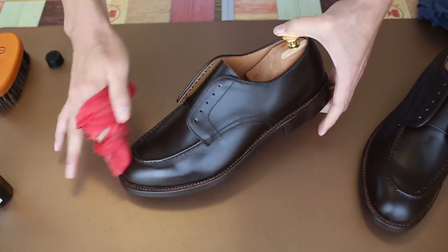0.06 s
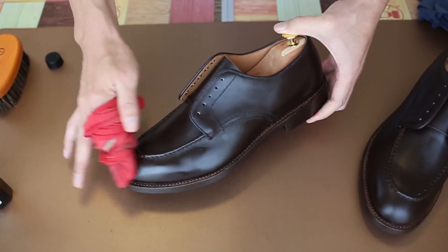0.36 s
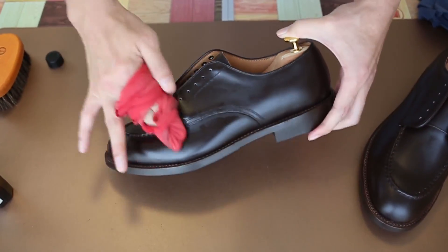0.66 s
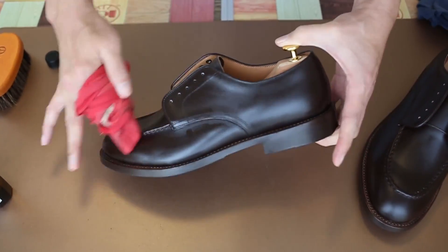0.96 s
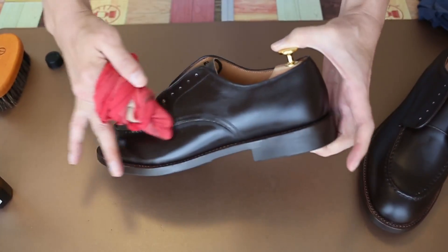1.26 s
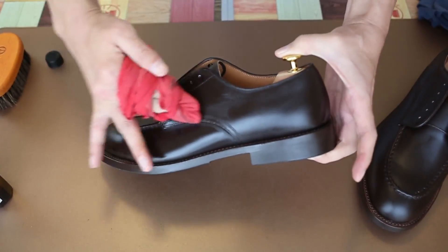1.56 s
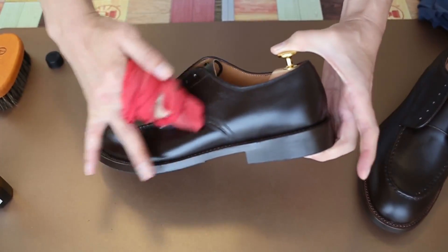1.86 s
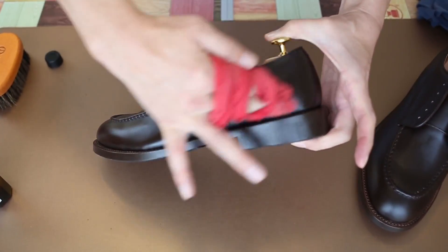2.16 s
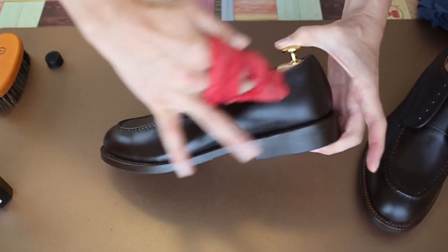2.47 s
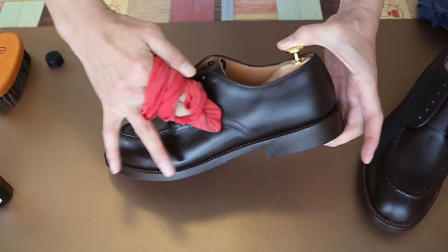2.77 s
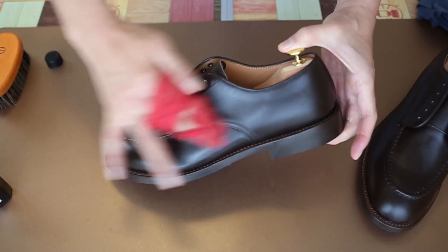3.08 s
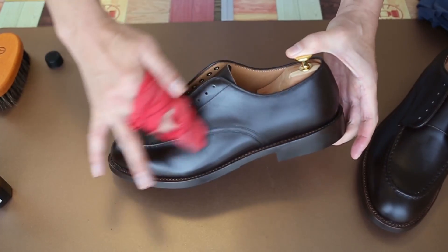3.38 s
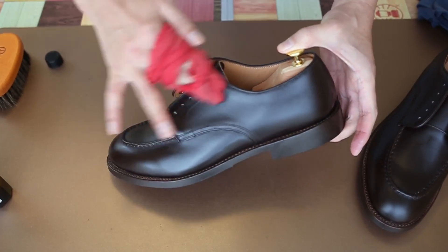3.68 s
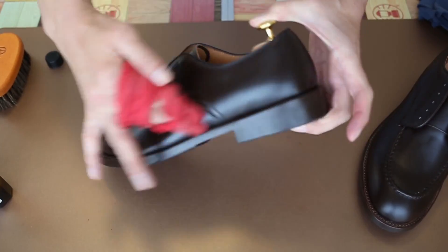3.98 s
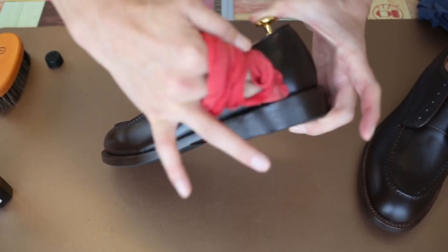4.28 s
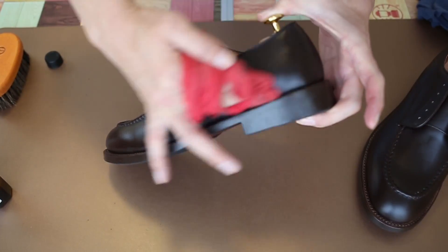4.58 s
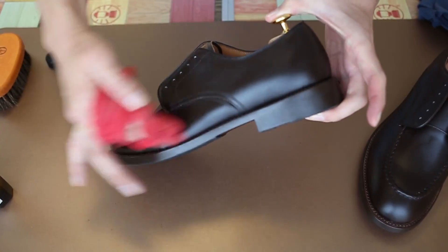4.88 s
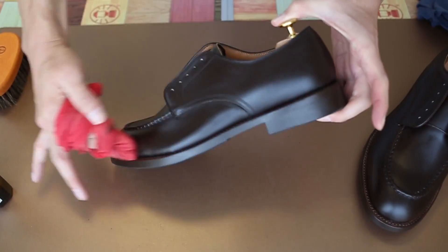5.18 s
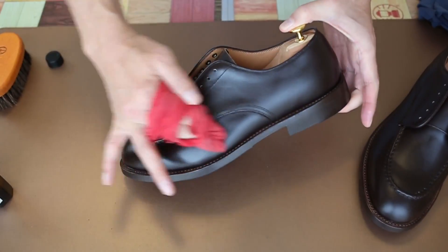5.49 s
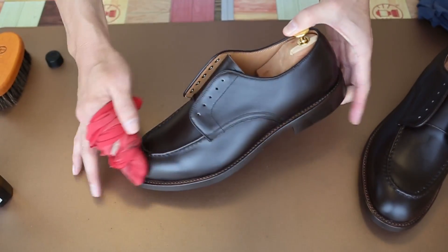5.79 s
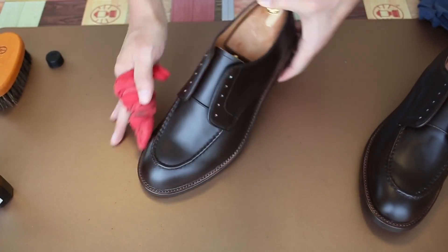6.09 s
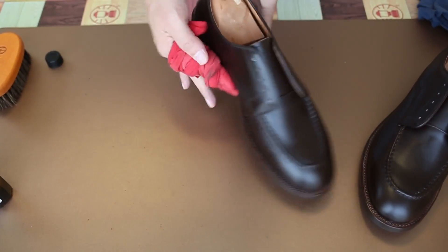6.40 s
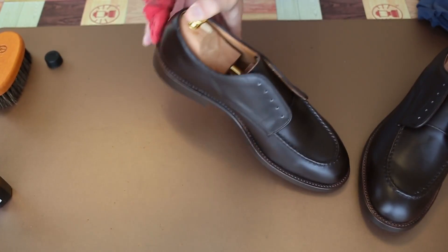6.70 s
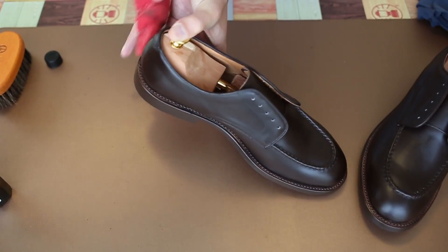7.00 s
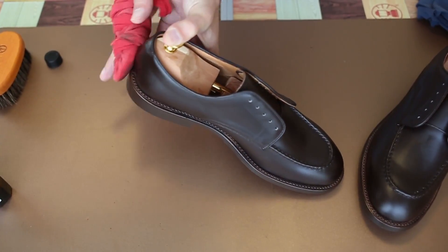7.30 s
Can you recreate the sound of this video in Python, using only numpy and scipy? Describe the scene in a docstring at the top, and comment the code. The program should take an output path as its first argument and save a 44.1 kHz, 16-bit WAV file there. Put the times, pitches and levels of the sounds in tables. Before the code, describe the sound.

From the start, a cloth buffs a leather shoe in quick, uneven back-and-forth strokes, roughly seven a second. Each stroke hisses and rasps, with a hollow tone from the shoe beneath and occasional tiny squeaks on the waxed leather. The rubbing begins softly, builds after half a second and is strongest around 3 to 4 seconds. Dull finger bumps and light taps are scattered throughout, with clearer taps near 1.1, 5.5 and 6 seconds. At about 6 seconds the strokes stop and the shoe scuffs through the hand as it is turned. At about 6.6 seconds it hits the table with one hard knock and a very short rattle, by far the loudest sound, briefly overloading the microphone. A light tap and a soft, slow rub follow until about 7.5 seconds. The sound is close and centred, in a small dry room.

```python
"""Quick hissing, rasping strokes to and fro: a cloth wound round two fingers buffs a leather shoe on a
wooden shoe tree. Sliding fibres hiss, the waxed leather rasps and chirps by stick-slip, fingers bump and
tap the hollow shoe. Then it is swung round, knocks hard on the work table and is rubbed slowly round the
heel in a new grip. Small dry room, one close microphone that the knock overloads."""
import sys
import numpy as np
from scipy import signal
from scipy.fft import rfft, irfft
from scipy.io import wavfile
from scipy.ndimage import uniform_filter1d, map_coordinates

SR = 44100
rng = np.random.default_rng(int(sys.argv[2]) if len(sys.argv) > 2 else 0)


def transcribe(u):
    """Save the signal u as a 16-bit wav file named by the first command-line argument.

    u: samples, shape (n,) or (channels, n), limited to [-1, 1]; the rate is SR.
    q: integer samples, one column per channel.
    """
    v = np.clip(np.atleast_2d(u).T, -1, 1)
    q = np.round(v * 32767).astype(np.int16)
    wavfile.write(sys.argv[1], SR, q)


N = 328545
TIME_S = np.arange(N) / SR
STROKES_END_S = 5.95

# cloth strokes, each ending where the next starts: start_s, hardest_s, hiss_db, rasp_db
STROKES = [(0, 0.001, -50, -44.5), (.139, 0.21, -51, -54), (0.25, 0.291, -51, -50.5),
           (0.352, 0.434, -48.5, -44), (0.491, 0.538, -50.5, -51), (0.579, 0.651, -40.5, -35),
           (0.712, 0.748, -42.5, -42.5), (0.815, .877, -40, -37.5), (0.912, .965, -42, -43),
           (1.024, 1.113, -40, -34), (1.258, 1.307, -44.5, -36.5), (1.371, 1.43, -48, -40),
           (1.467, 1.532, -43.5, -31), (1.596, 1.665, -42, -32), (1.695, 1.774, -39.5, -31),
           (1.831, 1.925, -38, -29.5), (1.927, 1.978, -36.5, -29.5), (2.116, 2.194, -44.5, -38.5),
           (2.241, 2.319, -43.5, -38.5), (2.383, 2.515, -40, -40.5), (2.569, 2.593, -38.5, -43),
           (2.673, 2.8, -36, -33), (2.831, 2.862, -38, -31.5), (2.935, 3.024, -35, -25),
           (3.076, 3.138, -34, -26), (3.219, 3.299, -31.5, -25.5), (3.358, 3.444, -40, -33.5),
           (3.487, 3.523, -40, -31), (3.585, 3.628, -37, -27.5), (3.705, 3.759, -37, -31.5),
           (3.802, 3.838, -34.5, -29.5), (3.901, 3.965, -41, -36), (3.998, 4.048, -35.5, -29),
           (4.174, 4.248, -46, -38), (4.328, 4.397, -45, -41), (4.501, 4.687, -39, -36.5),
           (4.879, 4.984, -36.5, -33.5), (5.049, 5.13, -34.5, -32.5), (5.267, 5.3, -74, -72),
           (5.35, 5.465, -39.5, -31), (5.512, 5.584, -37, -30), (5.674, 5.72, -46, -40.5),
           (5.774, 5.828, -48, -45.5)]
# hollowness under the cloth, most at the instep, least at the stiff heel: time_s, level_db
HOLLOWNESS = [(0, 1.5), (.5, -6), (.9, -2), (1.14, 1), (1.88, 7), (2.25, -17), (2.8, 4.5), (3.55, 2.5),
              (3.96, 0.5), (4.42, -21.5), (4.7, 1.5), (5.4, -7), (5.58, 3), (5.9, -2)]
# the four voices of a stroke (hiss, rasp, hollow, body): freq_hz, density_db
WEAVE_SPECTRUM = [(2500, -1), (3600, -3), (5500, 1), (7000, -0.5), (9400, -7.5), (11800, -0.5), (14000, -5),
                  (16000, -10)]
LEATHER_SPECTRUM = [(1400, -22.5), (1900, -5), (2250, -7), (2500, 0), (2780, -0.5), (3200, -4.5),
                    (3600, -8.5), (4500, -9.5), (7000, -23.5)]
HOLLOW_SPECTRUM = [(600, -34.5), (730, -2.5), (790, -10), (860, 2.5), (980, -0.5), (1090, -6.5),
                   (1220, 2.5), (1380, -1), (1600, -7), (2300, -5)]
BODY_SPECTRUM = [(40, -30.5), (110, -7), (168, 0), (215, -9.5), (270, -9.5), (340, 5.5), (440, 5), (530, 5),
                 (650, 2.5), (950, -1)]
# fingers and shoe tree bump the shoe: start_s, level_db, pitch_hz
BUMPS = [(.173, -30, 420), (0.238, -31, 580), (.49, -35.5, 506), (.952, -30.5, 427), (1.035, -33, 466),
         (1.116, -45, 410), (1.876, -35, 440), (2.194, -29, 443), (3.014, -29.5, 406), (3.278, -26, 399),
         (3.33, -22, 533), (3.413, -29, 384), (3.6, -33, 330), (4.16, -30.5, 487), (4.199, -32, 637),
         (4.774, -35, 427), (4.83, -31, 427), (4.903, -21, 418), (5.196, -32.5, 350), (6.025, -27, 427),
         (6.28, -27, 520), (7.192, -30, 474)]
# light taps: start_s, level_db, pitch_hz, thud_db, click_db
TAPS = [(.17, -38, 920, -3, 11.5), (.239, -29.5, 760, 8.5, 1), (.507, -47, 920, 4, 6),
        (1.119, -19, 1074, -11, 7), (1.151, -16, 1120, -4, -3), (2.849, -27, 1150, -14, 5.5),
        (4.04, -24, 950, -12, 9.5), (4.976, -25, 970, 1, 7.5), (5.119, -21, 970, -10, -5),
        (5.5361, -15, 917, 5.5, 7.5), (5.9686, -13, 950, -6, -1), (6.735, -34.5, 880, 3, 10),
        (6.807, -19.5, 972, -25, 1)]
# click of a tap: freq_hz, density_db
CLICK_SPECTRUM = [(200, -7), (900, 3.5), (1500, -7.5), (2600, 2.5), (4200, -14.5), (5400, -10), (9000, -21),
                  (16000, -24)]
# the shoe rocks in the hand: centre_s, level_db
ROCKS = [(.25, -55), (.97, -54), (1.16, -52), (3.33, -43), (3.414, -44), (3.53, -57), (3.64, -42.5),
         (4.22, -47), (4.91, -45), (5.03, -46), (5.21, -50), (5.868, -43), (7.05, -49), (7.32, -54)]
# its rumble: freq_hz, density_db
RUMBLE_SPECTRUM = [(25, -8), (70, -4.5), (120, -3), (175, 12), (230, -12), (400, -29)]
# cloth and fingers grab and slip on wax: centre_s, length_s, pitch_hz, level_db
CHIRPS = [(1.167, 0.017, 1100, -34), (1.203, 0.032, 1080, -34.5), (1.432, .011, 1265, -34.5),
          (1.55, .014, 1300, -28), (1.785, 0.0086, 980, -30), (1.786, .01, 2760, -29.5),
          (1.984, .02, 2165, -30), (2.074, 0.048, 2850, -41), (2.269, 0.017, 970, -42),
          (2.605, 0.018, 1486, -37), (2.735, 0.036, 5300, -37), (2.766, .03, 2724, -33),
          (3.019, 0.038, 2250, -27), (3.137, 0.043, 2830, -28.5), (3.283, 0.0037, 2895, -18),
          (3.301, 0.03, 2950, -22.5), (3.53, 0.021, 1450, -32), (3.764, 0.0051, 2100, -28),
          (3.83, .005, 2134, -24.5), (3.958, 0.0094, 1000, -28.5), (4.046, .0056, 2650, -27.5),
          (4.414, .015, 2630, -36.5), (4.682, 0.014, 2704, -32), (4.689, 0.015, 1303, -33.5),
          (4.978, 0.0084, 2800, -26), (5.121, 0.0079, 2600, -16), (6.31, 0.019, 2410, -33)]
# the shoe slides round in the hand: time_s, level_db
SLIDE_LEVEL = [(6.0, -46.5), (6.042, -43), (6.092, -45.5), (6.112, -39), (6.32, -34), (6.36, -42),
               (6.504, -34.5), (6.54, -42.5)]
# its scuff: freq_hz, density_db
SLIDE_SPECTRUM = [(100, -19), (250, -11.5), (420, -2), (560, -0.5), (660, -2.5), (740, 4), (890, 3),
                  (1200, -2), (1700, -7.5), (2400, -3), (3500, -8), (6000, -14.5), (9500, -22.5),
                  (12000, -18.5), (16000, -27)]
# the heel lands, then the shoe tree rattles: start_s, level_db, tick_db
CONTACTS = [(6.5633, 1.5, -7), (6.566, -14, -22), (6.573, -7.5, -23), (6.5742, -5, -6), (6.584, -16, 7)]
# damped thump of each contact; ringing of shoe and table: freq_hz, level_db, t60_s
THUMP_MODES = [(125, -22, 0.03), (213, -10.5, 0.035), (312, -11.5, 0.043), (755, 1, 0.01),
               (1010, 2, 0.0098), (2030, -4.5, 0.015), (2630, -8, 0.011), (55, -37, 0.047)]
RING_MODES = [(153, -8.5, 0.045), (248, -12.5, 0.033), (336, -13, 0.17), (487, -17.5, 0.084),
              (615, -23, 0.22), (717, -15.5, 0.14), (876, -18, 0.099), (883, -12.5, 0.087),
              (1080, -17, 0.046), (1920, -29, 0.064), (2150, -6, 0.062), (2284, -19, 0.084),
              (2410, -14.5, 0.11), (2870, -11, 0.071), (2720, -30, 0.13), (3330, -24, .11),
              (3460, -17.5, 0.073), (3780, -32, 0.11), (5040, -37.5, 0.097), (5460, -27, 0.11)]
# noise of the knock: freq_hz, density_db
CRACK_SPECTRUM = [(500, -22), (1400, 1), (2500, 11.5), (4000, -7.5), (6000, -4), (9000, -20), (11500, -24),
                  (16000, -31)]
CLATTER_SPECTRUM = [(60, -18), (170, -20), (330, 4.5), (900, 0.5), (1500, -5.5), (2500, -1), (4000, -8),
                    (6000, -16.5), (12000, -30)]
# slow rub round the heel: time_s, level_db
HEEL_LEVEL = [(6.83, -49), (6.9, -54), (6.912, -47), (6.98, -53.5), (7.142, -40.5), (7.306, -47.5),
              (7.382, -39), (7.45, -44.5)]
# its voices: hiss_db, rasp_db, hollow_db, body_db
HEEL_VOICES_DB = [-1.5, -1.5, -8, -11]
# wall reflections; still room; microphone hiss, differing between the ears: freq_hz, density_db
TAIL_SPECTRUM = [(60, 3.5), (300, -0.5), (800, 3.5), (1500, -8), (2600, -4.5), (5000, -9), (10000, -17),
                 (16000, -27)]
FLOOR_SPECTRUM = [(25, -4.5), (70, -6), (240, -11), (335, -1.5), (600, -23), (880, 1), (1600, -19),
                  (2600, -6.5), (4000, -11.5), (7000, -17.5), (9200, -21), (11800, -19.5), (16000, -19)]
MIC_SPECTRUM = [(15, -24), (25, 1), (249, 1), (659, -4.5), (911, -15.5), (2990, -24), (4490, -19),
                (11600, -4), (16000, -9)]


def from_db(db):
    """Decibels to gain."""
    return 10 ** (np.asarray(db) / 20)


def unit_rms(x):
    """Scale to rms 1."""
    return x / np.sqrt(np.mean(x ** 2) + 1e-20)


def coloured(x, spectrum):
    """Shape by a log-frequency spectrum, falling steeply past its ends; rms 1."""
    hz, db = np.transpose(spectrum)
    log_f = np.log(np.maximum(np.fft.rfftfreq(len(x), 1 / SR), 1))
    outside = np.maximum(np.log(hz[0]) - log_f, 0) + np.maximum(log_f - np.log(hz[-1]), 0)
    gain = from_db(np.interp(log_f, np.log(hz), db) - 135 * outside)
    return unit_rms(irfft(rfft(x) * gain, len(x)))


def noise(spectrum, samples=N):
    """Coloured noise; rms 1."""
    return coloured(rng.standard_normal(samples), spectrum)


def drift(rate_hz):
    """Random wander; rms 1."""
    knots = rng.standard_normal(N // 8)
    return unit_rms(np.interp(TIME_S * rate_hz, np.arange(len(knots)), knots))


def fade(t, t60_s):
    """Exponential decay."""
    return np.exp(-np.log(1000) * t / t60_s)


def ring(t, hz, t60_s):
    """One struck mode."""
    return np.sin(2 * np.pi * hz * t) * fade(t, t60_s)


def struck(t, modes):
    """Modes struck together, alternating in sign."""
    return sum((-1) ** k * from_db(db) * ring(t, hz, t60_s) for k, (hz, db, t60_s) in enumerate(modes))


def add(out, start_s, sound):
    """Mix in at start_s."""
    at = round(start_s * SR)
    out[at:at + len(sound)] += sound[:N - at]


def curve_db(points):
    """Level curve at every sample."""
    return np.interp(TIME_S, *np.transpose(points))


def friction(spectrum, snags_per_s, snag_db, judder_db):
    """Fibres slide under a juddering contact; a few snag and snap free."""
    snags = (rng.random(N) < snags_per_s / SR) * rng.standard_normal(N)
    fibres = rng.standard_normal(N) + from_db(snag_db) * unit_rms(snags)
    return coloured(fibres * from_db(judder_db * drift(rate_hz=220)), spectrum)


def strokes(light_touch_db=-58.5, usual_rasp_db=-35, relax_share=0.77):
    """Four voice gains and hand speed: speed drives the hiss, pressure the rasp, hollow and body."""
    gains, speed = np.zeros((4, N)), np.zeros(N)
    place_db = curve_db(HOLLOWNESS)
    ends_s = [stroke[0] for stroke in STROKES[1:]] + [STROKES_END_S]
    for (start_s, hardest_s, hiss_db, rasp_db), end_s in zip(STROKES, ends_s):
        now = (TIME_S >= start_s) & (TIME_S < end_s)
        t = TIME_S[now]
        fastest_s = hardest_s + 0.374 * ((start_s + end_s) / 2 - hardest_s)
        speed[now] = np.sin(np.pi / 2 * np.interp(t, [start_s, fastest_s, end_s], [0, 1, 0]))
        pressure = np.interp(t, [start_s, hardest_s, end_s], [0, 1, 0]) ** 0.65
        relaxed_db = relax_share * (rasp_db - light_touch_db) * (pressure - 1)
        extra_db = rasp_db - usual_rasp_db
        # the cloth sticks at each turn, longer on a long stroke
        turn_s = 0.009 + 0.027 * (end_s - start_s)
        stuck_db = -9 * np.exp(-(np.minimum(t - start_s, end_s - t) / turn_s) ** 4)
        hiss = from_db(hiss_db + stuck_db) * (0.14 + 0.86 * speed[now] ** 1.43)
        rasp = from_db(rasp_db + relaxed_db + 0.43 * stuck_db)
        hollow = from_db(-40.5 + place_db[now] + 0.49 * extra_db + 0.87 * relaxed_db)
        body = from_db(-48.5 + 0.5 * place_db[now] + 0.083 * extra_db + 0.45 * relaxed_db)
        gains[:, now] = hiss, rasp, hollow, body
    return gains, speed


def buffing(gains, speed):
    """The weave hisses, the leather rasps, the hollow shoe sounds beneath."""
    hiss_gain, rasp_gain, hollow_gain, body_gain = gains
    # the rasp sharpens with speed and wanders as the cloth moves over the shoe
    pitch_ratio = 1 + 0.09 * (speed - 0.8) + 0.025 * drift(rate_hz=14)
    leather = friction(LEATHER_SPECTRUM, snags_per_s=500, snag_db=-7.5, judder_db=1.5)
    rasp = from_db(-1.7) * map_coordinates(leather, [np.cumsum(pitch_ratio)], order=3, mode="grid-wrap")
    hiss = friction(WEAVE_SPECTRUM, snags_per_s=1300, snag_db=-8, judder_db=1)
    hollow = friction(HOLLOW_SPECTRUM, snags_per_s=400, snag_db=-4.5, judder_db=3)
    body = friction(BODY_SPECTRUM, snags_per_s=100, snag_db=-3, judder_db=2.5)
    return hiss_gain * hiss + rasp_gain * rasp + hollow_gain * hollow + body_gain * body


def bumps(turn_lag_s=0.02, turn_db=-48, turn_hz=454, attack_s=0.004):
    """Padded touches: a dull thud and a crumple of leather. A faint one follows each turn of the cloth."""
    out, t = np.zeros(N), TIME_S[:SR // 5]
    at_turns = [(stroke[0] + turn_lag_s, turn_db + 3 * force, turn_hz * 2 ** (0.22 * place))
                for stroke, (force, place) in zip(STROKES, rng.standard_normal((len(STROKES), 2)))]
    for start_s, level_db, hz in BUMPS + at_turns:
        spectrum = [(hz / 3, -7), (hz, 0), (1.84 * hz, -3), (3 * hz, -16), (12 * hz, -27)]
        crumple = 0.4 * noise(spectrum, len(t)) * fade(t, t60_s=0.083)
        thud = 1.03 * ring(t, hz, t60_s=0.05)
        add(out, start_s, from_db(level_db + 1) * (thud + crumple) * (1 - np.exp(-t / attack_s)))
    return out


def taps(attack_s=0.0005):
    """Light contacts: a click, a knock of the hollow shoe, a thud from the sole."""
    out, t = np.zeros(N), TIME_S[:SR // 5]
    for start_s, level_db, hz, thud_db, click_db in TAPS:
        click = from_db(click_db) * 0.6 * noise(CLICK_SPECTRUM, len(t)) * fade(t, t60_s=0.014)
        hollow = 0.59 * ring(t, hz, 0.037) - 0.14 * ring(t, 0.696 * hz, 0.029) + 0.15 * ring(t, 880, 0.15)
        thud = from_db(thud_db) * 0.42 * ring(t, hz=428, t60_s=0.027)
        add(out, start_s, from_db(level_db) * (hollow + thud + click) * (1 - np.exp(-t / attack_s)))
    return out


def rocking(half_width_s=0.028):
    """The heavy shoe gives way in the holding hand with a low rumble."""
    gain = sum(from_db(db) * np.exp(-((TIME_S - centre_s) / half_width_s) ** 2) for centre_s, db in ROCKS)
    return gain * noise(RUMBLE_SPECTRUM)


def faint_chirps(rasp_gain, per_s=9, length_s=0.02, low_hz=1200, high_hz=5470):
    """Random extra rows for CHIRPS; their level follows the rasp."""
    rows = []
    for when, note in rng.random((round(per_s * N / SR), 2)):
        at = int(when * N)
        level_db = 20 * np.log10(rasp_gain[at] + 1e-9) - 5.5
        rows.append((TIME_S[at], length_s, low_hz * (high_hz / low_hz) ** note, level_db))
    return rows


def chirps(rasp_gain, width_share=0.124, rise_octaves_per_s=2.5, roughness=0.43):
    """Stick-slip swells into a brief, rough, rising tone and lets go."""
    out, t = np.zeros(N), np.arange(-SR // 16, SR // 16) / SR
    for centre_s, length_s, hz, level_db in CHIRPS + faint_chirps(rasp_gain):
        low_pass = signal.butter(2, width_share * hz, fs=SR, output="sos")
        wander, flutter = unit_rms(signal.sosfilt(low_pass, rng.standard_normal((2, len(t)))))
        pitch_hz = hz * (2 ** (rise_octaves_per_s * t) + 0.546 * width_share * wander)
        tone = np.sin(2 * np.pi * np.cumsum(pitch_hz) / SR) * (1 + roughness * flutter)
        swell = np.exp(-2 * (t / length_s) ** 2)
        tone /= np.sqrt(np.average(tone ** 2, weights=swell ** 2))
        add(out, max(centre_s + t[0], 0), from_db(level_db - 0.5) * tone * swell)
    return out


def slide():
    """Leather scuffs through the fingers as the shoe is turned, until the heel lands."""
    turning = (TIME_S > STROKES_END_S) & (TIME_S < CONTACTS[0][0])
    scuff = friction(SLIDE_SPECTRUM, snags_per_s=540, snag_db=-12, judder_db=0.5)
    return from_db(curve_db(SLIDE_LEVEL) - 0.1) * turning * scuff


def knock():
    """Each contact thumps, cracks and ticks; the first sets shoe and table ringing and clattering."""
    out, t = np.zeros(N), TIME_S[:SR // 2]
    for start_s, level_db, tick_db in CONTACTS:
        crack = from_db(-2.5) * noise(CRACK_SPECTRUM, len(t)) * fade(t, t60_s=0.021)
        tick = from_db(tick_db) * rng.standard_normal(len(t)) * fade(t, t60_s=0.0024)
        add(out, start_s, from_db(level_db) * (struck(t, THUMP_MODES) + crack + tick))
    clatter = from_db(-9.5) * noise(CLATTER_SPECTRUM, len(t)) * fade(t, t60_s=0.23)
    add(out, CONTACTS[0][0], from_db(2.5) * struck(t, RING_MODES) + clatter)
    return out


def heel_rub():
    """Four voice gains and hand speed for the cloth drawn steadily round the heel."""
    on_heel = TIME_S > HEEL_LEVEL[0][0]
    gains = from_db(HEEL_VOICES_DB)[:, None] * from_db(curve_db(HEEL_LEVEL))
    return gains * on_heel, 0.7 * on_heel


def room(x, t60_s=0.26, level_db=-17, build_s=0.0017):
    """Faint, dull, diffuse tail from the walls."""
    t = TIME_S[:SR // 2]
    tail = noise(TAIL_SPECTRUM, len(t)) * fade(t, t60_s) * (1 - np.exp(-t / build_s))
    return from_db(level_db) * signal.fftconvolve(x, tail / np.sqrt(np.sum(tail ** 2)))[:N]


def gain_control(x, threshold_db=-6, depth_db=7, recovery_db_per_s=24, attack_s=0.011):
    """Overload cuts the gain fast; it creeps back."""
    over_db = np.clip(20 * np.log10(np.abs(x).max(axis=0) + 1e-9) - threshold_db, 0, depth_db)
    recovery_db = recovery_db_per_s * TIME_S
    held_db = np.maximum.accumulate(over_db + recovery_db) - recovery_db
    pole = np.exp(-1 / (attack_s * SR))
    return x * from_db(-signal.lfilter([1 - pole], [1, -pole], held_db))


def scene():
    """Shoe and room dead centre; only the microphone hiss is wide."""
    stroke_gains, stroke_speed = strokes()
    heel_gains, heel_speed = heel_rub()
    gains = uniform_filter1d(stroke_gains + heel_gains, size=220, axis=1)   # 5 ms smoothing
    floor = from_db(-51) * noise(FLOOR_SPECTRUM)
    side = from_db(-68.5) * noise(MIC_SPECTRUM)
    shoe = buffing(gains, stroke_speed + heel_speed)
    shoe += bumps() + rocking() + slide() + taps() + knock() + chirps(rasp_gain=gains[1])
    mid = shoe + room(shoe) + floor
    return np.array([mid + side, mid - side])


def record(dry):
    """The knock outruns the gain control and clips at full scale; low-pass at 16 kHz."""
    clipped = np.clip(gain_control(dry), -1, 1)
    return signal.sosfilt(signal.ellip(10, 0.1, 70, 16000, fs=SR, output="sos"), clipped)


dry = scene()
out = record(dry)
transcribe(out)
```